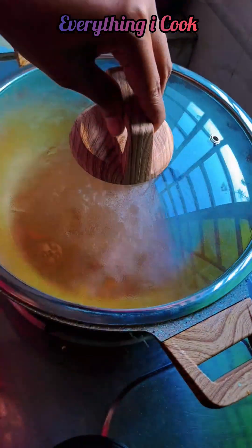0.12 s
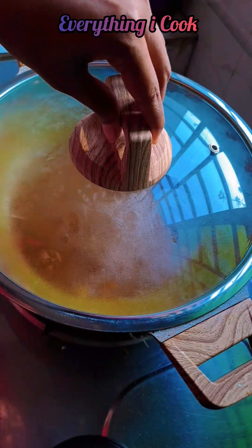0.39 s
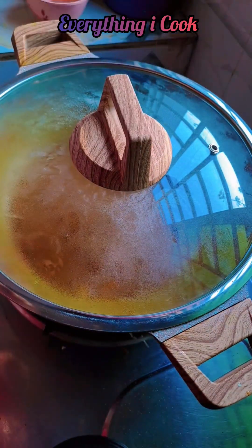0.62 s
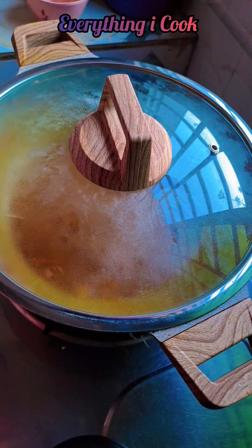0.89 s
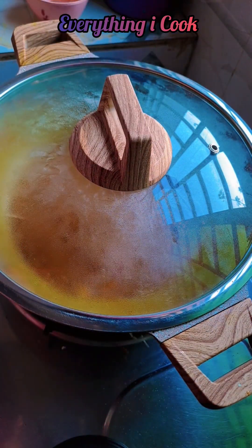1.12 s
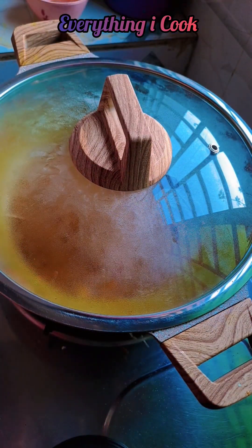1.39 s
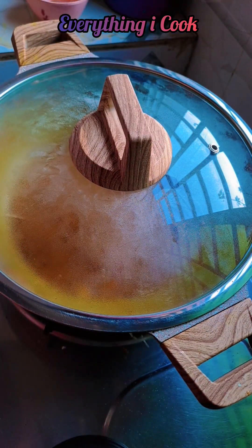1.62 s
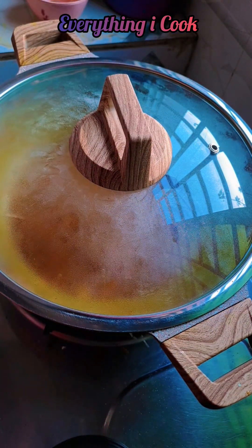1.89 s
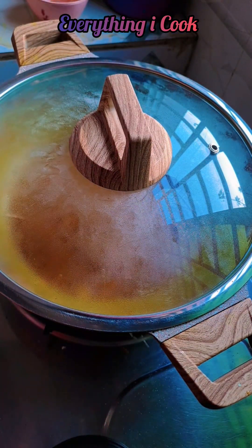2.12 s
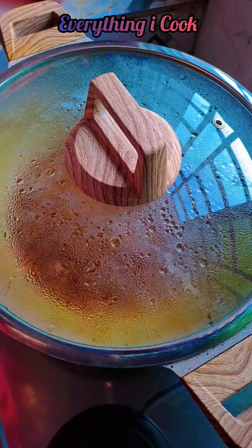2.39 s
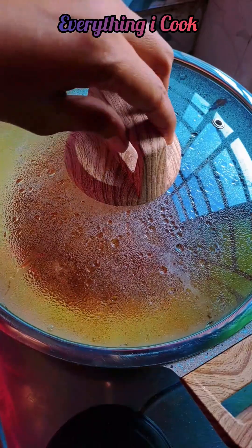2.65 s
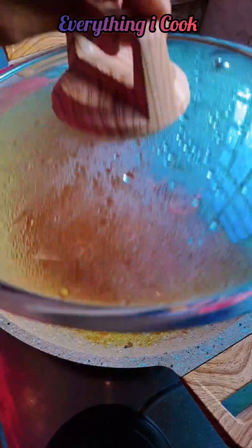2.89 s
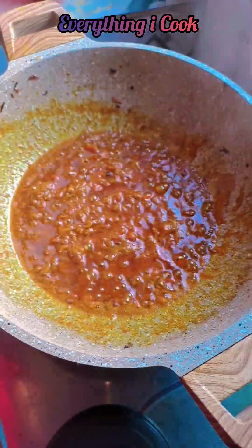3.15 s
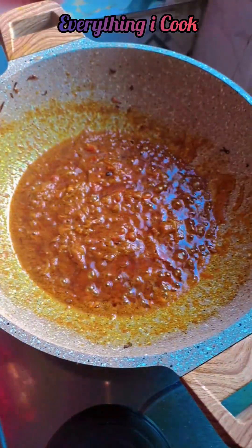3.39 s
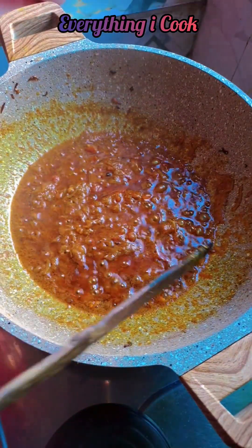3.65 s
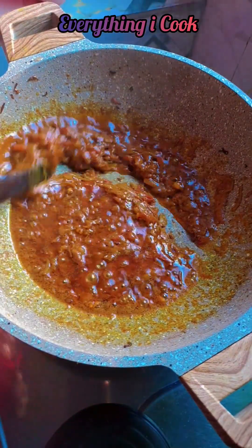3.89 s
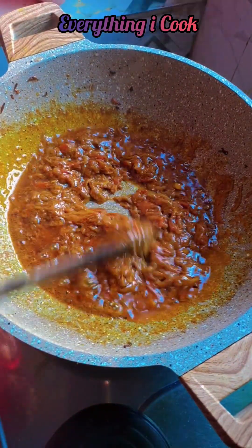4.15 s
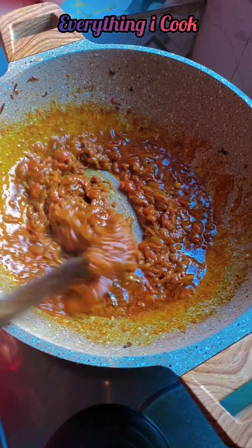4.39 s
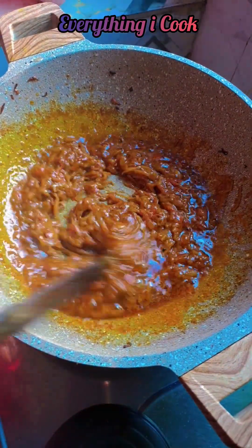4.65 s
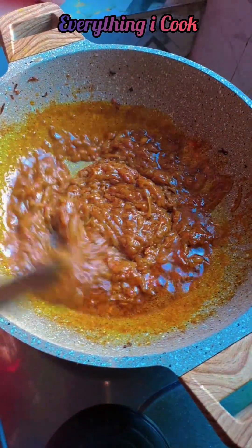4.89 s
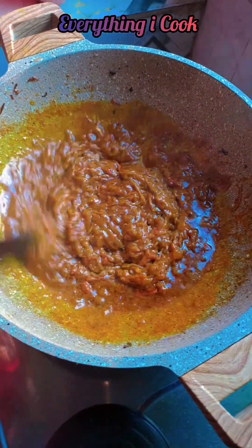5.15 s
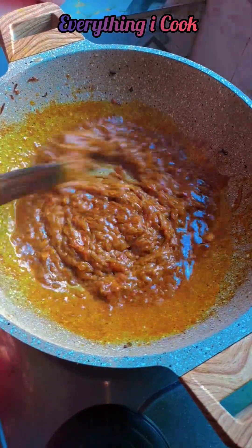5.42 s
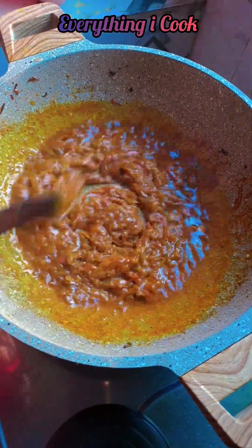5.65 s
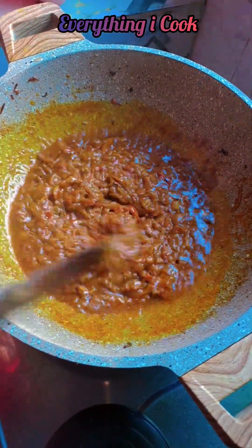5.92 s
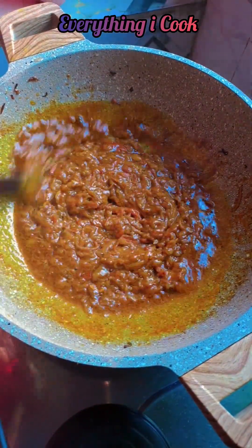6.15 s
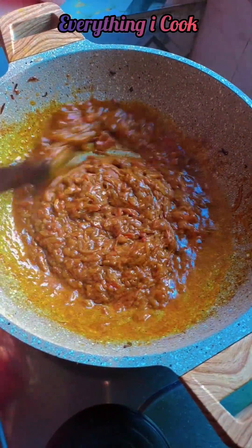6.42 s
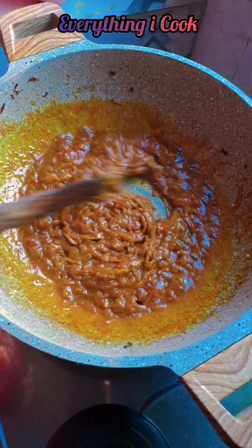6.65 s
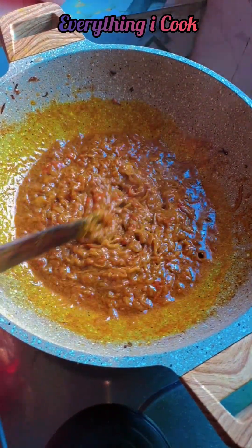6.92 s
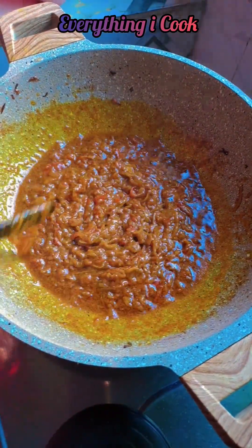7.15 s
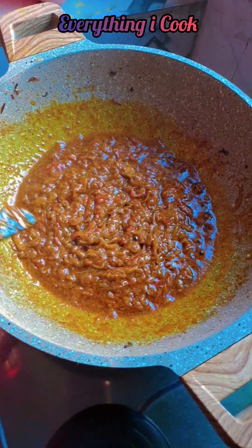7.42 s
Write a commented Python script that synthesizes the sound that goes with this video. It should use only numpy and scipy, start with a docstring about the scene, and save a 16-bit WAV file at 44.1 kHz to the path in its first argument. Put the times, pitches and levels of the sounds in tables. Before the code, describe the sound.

A close, slightly dull-topped home kitchen with low rumble, faint gas hiss and short reflections. At 0.05 s a lid lands with a low pan thud. From 0.3 to 1.2 s wooden objects shuffle in irregular knocks, with fainter ones near 1.6. Quick, rough trilled bird whistles, mostly falling, come at 1.15-1.6 and 2.1; dishes knock around 1.9-2.1. Complete silence from 2.2 to 2.38, then a fast fade-in: muffled glass lid knocks and a strong clank at 3.0. Frying is now open, a soft sizzle that swells from 3.6, with bright spits at 3.9-4.9 and a crackle cluster near 4.8. A spatula rubs and bumps, with a hard blow at 4.97 and a heavy one at 6.06, the pan rocking low on its grate until 6.7. Small tinks are scattered throughout. Loud ringing rim raps come in pairs at 7.03/7.12 and 7.42/7.52, over easing sizzle.

```python
"""In a home kitchen a glass lid is set on a simmering pan; wood is shuffled, dishes clatter, a bird calls outside.
After a short silence the lid comes off, the sauce fries openly and a wooden spatula stirs it, scraping the pan,
rocking it on the stove and rapping the rim in two pairs. Knocks are short noise bursts that make sets of notes ring;
frying and rubbing are showers of random clicks; the air is shaped noise; the bird is gliding, trilled whistles."""
import sys
import numpy as np
from scipy import signal
from scipy.fft import rfft, irfft, next_fast_len
from scipy.io import wavfile

SR = 44100
rng = np.random.default_rng(int(sys.argv[2]) if len(sys.argv) > 2 else 0)


def makeup_ratio(level_db):
    """Linear amplitude ratio for a level in decibels (20 dB per factor of ten)."""
    decades = np.asarray(level_db, float) / 20
    return 10 ** decades


def dump_mix(stems):
    """Bounce the given channels to the path in sys.argv[1] as a 16-bit WAV at rate SR."""
    frames = np.atleast_2d(stems).T  # one column per channel
    limited = np.clip(frames, -1, 1)  # hard clip at full scale
    pcm = np.round(limited * 32767).astype(np.int16)
    wavfile.write(sys.argv[1], SR, pcm)


N = 332514

# Kitchen air and gas flame. Each row: pitch in Hz, relative strength in dB per Hz.
AIR_SPECTRUM = [(25, -15), (55, 6), (110, 2.5), (250, -3), (400, -6.5), (700, -17), (1500, -21.5),
                (3300, -31), (5000, -22.5), (7000, -30), (8300, -34.5), (10500, -34), (13000, -35),
                (16000, -29)]
# Whistle bands of the gas jet. Each row: pitch in Hz, width in Hz of each filter pass, average level in dB.
GAS_JET = [(6260, 1060, -65), (12500, 1600, -65.5)]
# Bird calls. Each row: start in seconds, length in seconds, first pitch in Hz, last pitch in Hz,
# level in dB before the trill.
BIRD_CALLS = [(1.147, 0.05, 2700, 3160, -48.5), (1.163, 0.072, 5060, 2890, -46),
              (1.35, .12, 2000, 2500, -62.5), (1.447, 0.054, 4270, 3980, -58.5),
              (1.527, 0.091, 4700, 3450, -50), (2.102, 0.093, 5200, 2700, -47)]

# Knocks of hard things. Each row: start in seconds, peak in dB, rattle length in seconds,
# tilt of the ringing in dB per octave, hardness as scratch in dB against the ringing.
WOOD_SHUFFLES = [(.332, -26, .025, 8.5, -10.5), (.390, -28, 0.024, -3.5, -38.5),
                 (.538, -29.5, 0.051, 0.5, -14), (.682, -18.5, 0.062, 3.5, -38),
                 (.755, -22, 0.038, 4.5, -40), (.80, -28, 0.083, -4.5, -19), (.87, -30.5, 0.082, 0, -33),
                 (.942, -21.5, 0.039, -2.5, -12), (.983, -19, 0.012, 6, -19), (1.056, -31, .008, 7.5, -19),
                 (1.066, -23, 0.0064, -9, -35), (1.152, -41, 0.027, 12, -6), (1.46, -48, 0.055, -5, -5),
                 (1.606, -37.5, 0.029, -1, 1.5), (1.63, -32, 0.032, -7, -15),
                 (1.683, -38, 0.013, -7.5, -12)]
DISH_KNOCKS = [(.942, -36, 0.069, 5, -3), (1.924, -23.5, 0.031, 0.7, -8), (1.965, -32, 0.019, 0, -2),
               (2.068, -38.5, 0.024, -2.5, -22)]
LID_SET_DOWN = [(.055, -18, 0.034, -9, -20.5)]
LID_KNOCKS = [(2.40, -34.5, 0.1, 4, -26), (2.452, -28.5, 0.059, 4.5, -5), (2.566, -24.5, .013, -9, -35),
              (2.602, -19, 0.035, 3, -6), (2.635, -27.5, 0.026, -8, -10), (2.70, -33.5, .015, 4.5, -1),
              (2.772, -29.5, 0.035, -13, -21), (2.806, -34, 0.0048, 17, -1), (2.81, -30, 0.054, -12, -30),
              (2.955, -32.5, 0.016, 5, -12), (3.035, -14, 0.027, -3, -35)]
LID_CLANKS = [(3.02, -14.5, 0.026, 4.2, 0.97)]
STIR_KNOCKS = [(3.563, -27, 0.0085, -8, -19), (4.205, -28.5, 0.02, -6, -19), (4.61, -26.5, 0.014, 3, -8),
               (4.93, -29.5, 0.046, -3, -21.5), (4.972, -15.5, 0.027, -11, -9), (5.353, -37, 0.01, -1, -15),
               (5.613, -29, .008, 1, -10), (5.915, -29, .016, 0, -7), (6.062, -11, .03, -1.5, -5),
               (6.11, -31, 0.018, -11, -2), (6.245, -25, 0.03, 1.3, -33), (6.379, -31.5, 0.054, 4.5, -9),
               (6.58, -22, 0.035, 1, -9), (6.64, -31.5, .033, 0.5, -2), (6.975, -33, 0.0067, -2, -15),
               (7.346, -29, 0.025, -7.5, -15)]
SPATULA_BLOW = [(4.974, -15.5, 0.017, 0.1, -8)]
# Raps on the rim. Each row: start in seconds, peak in dB, hardness as scratch in dB against the ringing.
RAPS = [(7.0293, -3.5, -23), (7.1215, -6, -7.5), (7.4193, -5, -18.5), (7.5247, -4, -21)]
# The pan drops back on the grate. Each row: start in seconds, peak in dB.
ROCKS = [(6.067, -14), (6.19, -30.5), (6.247, -22.5), (6.497, -35), (6.583, -26.5), (6.659, -36),
         (6.735, -36)]
# Small one-note tinks. Each row: start in seconds, level in dB before onset and decay, middle pitch in Hz.
TINK_NOTES = [(.597, -51, 3730), (2.454, -32.5, 1650), (2.699, -31.5, 1570), (2.807, -38.5, 2810),
              (3.25, -37, 760), (4.272, -32.5, 2580), (4.529, -29, 2580), (5.401, -31.5, 2600),
              (6.675, -29, 1630), (6.794, -32.5, 1610), (7.18, -32.5, 2690)]

# What rings in each thing. Each row: pitch in Hz, relative level in dB,
# time in seconds to fade by 60 dB when nothing damps it.
WOOD_MODES = [(320.4, -1, 0.28), (359, -11.5, 0.18), (696, 0.5, 0.089), (773, 2.5, .1), (904, -2, 0.069),
              (1210, -7, 0.078), (1387, -11, 0.08), (1980, -6.5, 0.012), (2450, -11.5, 0.013),
              (3070, -20, .03)]
CROCKERY_MODES = [(1064, 2.5, 0.052), (1770, 4.5, 0.046), (2253, -0.5, .2), (2270, 3.5, 0.1),
                  (2550, -11.5, 0.094), (3870, 1.5, 0.11), (5550, 2, 0.1), (5900, -5, .08),
                  (7240, -20, .08), (7967, -26, .06), (9700, -15, .06), (11100, -1.5, .06),
                  (12300, -9, .08)]
GRATE_MODES = [(97, 2.5, 0.13), (181.4, -9.5, 0.2)]
CLOSED_PAN_MODES = [(64.5, -26, 0.44), (116, -7.5, 0.046), (159, 1, 0.35), (230, 8, 0.13), (377, -12, 0.19),
                    (474, 2.5, .14), (802, -51, .1), (1390, -22, .08)]
GLASS_MODES = [(204, -9, 0.28), (259, -4.5, 0.34), (328, 5, .15), (408.5, -2.5, 0.17), (502, -3, 0.13),
               (692, -3.5, 0.12), (790, -11, 0.063), (1809, -17.5, 0.85), (1964, -6, 0.11),
               (2320, -8.5, 0.061), (2900, -19.5, 0.042), (4300, -23, .05), (5060, -12, 0.082),
               (6530, -44, .08)]
PAN_MODES = [(146, -14, 1), (229.3, -4, 0.51), (299, -1.5, 0.26), (356.5, 0.5, 0.22), (416.4, -1.5, 0.39),
             (480.4, 6, 0.17), (547, -0.5, 0.22), (621, -2.5, 0.11), (608, 12, 0.046), (688, -3.5, 0.15),
             (745, -5.5, 0.22), (832, -4.5, 0.04), (1028, -5, 0.092), (1034, -3, 0.033), (1187, -3.5, 0.31),
             (1373, -7, 0.21), (1540, -54, 0.078), (1780, -19, .06), (2000, -1, 0.14), (2600, -1, 0.15),
             (2916, -11, 0.22), (4270, 1, 0.061), (5200, -10, 0.13), (6540, -5, 0.073)]
SPATULA_MODES = [(1396, -5.5, 0.1), (2600, -0.7, 0.055), (4600, -2.5, 0.068), (7150, -8, .05)]

# Spatula or lid pressing on the pan as it rubs. Each row: time in seconds, rubbing level in dB before unevenness.
RUBBING_LEVEL = [(2.66, -52), (3.47, -54.5), (4.22, -46), (5.09, -43), (5.62, -47), (5.85, -44.5),
                 (6.11, -40), (6.3, -44), (6.87, -51), (7.43, -46), (7.54, -43)]
# Dull resonances of the full pan. Each row: pitch in Hz, width in Hz, relative level in dB.
RUBBED_MODES = [(278, 200, -6), (600, 82, 4.5), (790, 83, 1), (1173, 155, -4), (1650, 440, -9.5),
                (2580, 170, -6.5)]
# The sauce frying. Each row: time in seconds, vigour as fizz in dB,
# brightness in dB (up where bare hot pan is laid open).
FRYING_COURSE = [(2.66, -49.5, -3.5), (3.56, -50.5, -4.5), (3.62, -46, -4.5), (4.05, -38.5, 4.5),
                 (4.14, -41, 2.5), (4.28, -38.5, 1.5), (4.59, -36.5, 2), (4.79, -42, -0.5),
                 (4.93, -39.5, 0.5), (5.1, -40.5, -8), (5.3, -43, 2.5), (5.37, -42.5, -5.5),
                 (5.54, -39.5, 1), (5.68, -41.5, -1.5), (5.88, -40.5, 5), (6.41, -44.5, -6),
                 (6.62, -41, 1.5), (6.72, -43, -2), (6.84, -42, -1), (6.9, -45.5, -3.5), (7.3, -47, -4.5),
                 (7.54, -44.5, -6)]
# Colour of the fizz. Each row: pitch in Hz, relative strength in dB per Hz.
FIZZ_SPECTRUM = [(710, -7.5), (1200, -2.5), (2180, -6), (2530, -2.5), (3250, -3), (4310, -1.5),
                 (5300, -3.5), (6650, -6), (7600, -9), (9000, -8.5), (10400, -6), (11800, -0.5),
                 (13200, -5.5), (15200, -6.5), (16000, -10.5)]
# The loudest spits of oil. Each row: time in seconds, peak in dB, pitch in Hz.
LOUD_POPS = [(3.8965, -22, 11900), (4.0078, -20.5, 11300), (4.0277, -18.5, 11500), (4.0502, -19, 11800),
             (4.2255, -17.5, 11900), (4.2832, -18, 11800), (4.3505, -21, 11500), (4.5027, -16, 12100),
             (4.5965, -15, 11800), (4.6165, -23, 11900), (4.772, -18, 4100), (4.8281, -17, 11000),
             (4.8963, -18, 4760), (5.8456, -15, 10500)]

SILENCE_S, FADE_IN_S = (2.2165, 2.377), 0.04


def rms_one(x):
    """Scale a sound to an average (rms) strength of 1."""
    return x / np.sqrt(np.mean(x ** 2) + 1e-20)


def in_time(rows):
    """Draw each column of a time table as a curve with one value a sample."""
    s, *columns = np.transpose(rows)
    return [np.interp(np.arange(N) / SR, s, c) for c in columns]


def drift(rate_hz):
    """Slow random wandering of spread 1: noise smoothed twice, worked out at every 40th sample."""
    r = np.exp(-80 * np.pi * rate_hz / SR)
    noise = rng.standard_normal(N // 40 + 2002)
    slow = signal.lfilter([1], [1, -2 * r, r * r], noise)[2000:]   # leave out the start-up
    return np.interp(np.arange(N) / 40, np.arange(len(slow)), rms_one(slow))


def coloured(x, spectrum):
    """Weight the pitches of x by a spectrum of (Hz, dB) points and scale to rms 1."""
    hz, db = np.transpose(spectrum)
    bins = np.maximum(np.arange(len(x) // 2 + 1) * SR / len(x), 1)
    weight = makeup_ratio(np.interp(np.log(bins), np.log(hz), db))
    return rms_one(irfft(rfft(x) * weight, len(x)))


def resonance(x, hz, width_hz):
    """Let through a band around one pitch, like a damped spring, with gain 1 on top."""
    r = np.exp(-np.pi * width_hz / SR)
    top = np.array([1, 0, -1]) * (1 - r * r) / 2
    return signal.lfilter(top, [1, -2 * r * np.cos(2 * np.pi * hz / SR), r * r], x)


def ring(x, hz, t60):
    """Ring a note that fades by 60 dB in t60 seconds; a unit click starts it at height 1."""
    return resonance(x, hz, np.log(1000) / np.pi / t60) * SR * t60 / np.log(1000)


def grains(per_s, spread_db):
    """Random clicks of either sign, many small and a few large."""
    sizes = makeup_ratio(spread_db * np.minimum(rng.exponential(1, N), 5)) * rng.choice([-1, 1], N)
    return sizes * (rng.random(N) < per_s / SR) + 1e-18


def add(out, s, sound):
    """Mix a short sound in at time s in seconds."""
    i = round(s * SR)
    out[i:i + len(sound)] += sound[:N - i]


def contacts(events, modes, damping, dense_db, scratch_hz, rise_s, softening):
    """Each knock is a noise burst that rings the modes, each with two chance neighbours, and is heard as a scratch.
    softening: dB of longer rise time per dB of lost scratch (a negative one shortens the rise)."""
    out, t = np.zeros(N), np.arange(int(.4 * SR)) / SR
    for s, db, rattle, tilt_db, scratch_db in events:
        rise = rise_s * makeup_ratio(-softening * scratch_db)
        envelope = (1 - np.exp(-t / rise)) * np.exp(-(t / rattle) ** 2)
        force = rng.standard_normal(len(t)) * envelope + 1e-18
        detune, body = rng.uniform(-1.06, 1, (len(modes), 2)), 0
        for (hz, mode_db, t60), pair in zip(modes, detune):
            t60 = t60 * damping   # below 1 the ringing is shorter
            near = resonance(force, hz, 0.79 * hz)   # a mode takes up mostly force near its own pitch
            neighbours = [(hz * (1 + 0.127 * p), dense_db, 0.93 * t60) for p in pair]
            for f, d, decay in [(hz, 0, t60)] + neighbours:
                note = ring(near, f, decay)
                level = makeup_ratio(mode_db + d + tilt_db * np.log2(f / 600)) * np.sqrt(decay)
                body = body + level * note / np.linalg.norm(note)
        scratch = resonance(force, scratch_hz, 0.67 * scratch_hz)
        scratch = resonance(scratch, scratch_hz, 2.93 * scratch_hz) + 0.0093 * force
        sound = body / np.abs(body).max() + makeup_ratio(scratch_db) * scratch / np.abs(scratch).max()
        add(out, s, makeup_ratio(db) * sound / np.abs(sound).max())
    return out


def air():
    """Low rumble of the house, faint flame hiss and two gas-jet whistles, all noise of wandering level."""
    # the level rises once the cook works at the stove, 3.55 s in
    level_db = np.where(np.arange(N) < 3.55 * SR, -52, -48)
    out = makeup_ratio(level_db + 1.9 * drift(5.7)) * coloured(rng.standard_normal(N), AIR_SPECTRUM)
    for hz, width, db in GAS_JET:
        whistle = rng.standard_normal(N)
        for _ in range(3):
            whistle = resonance(whistle, hz, width)
        out += makeup_ratio(db + 1.1 * drift(7.0)) * rms_one(whistle)
    return out


def bird():
    """Whistles, most of them falling, whose loudness trills 145 times a second and whose pitch is rough."""
    out = np.zeros(N)
    for s, length, start_hz, end_hz, db in BIRD_CALLS:
        t = np.arange(int(length * SR)) / SR
        waver = rms_one(signal.lfilter([1], [1, -.98], rng.standard_normal(SR // 4)))[:len(t)]
        pitch = (start_hz + (end_hz - start_hz) * t / length) * (1 + 0.091 * waver)
        trill = (1 + 0.41 * np.cos(2 * np.pi * 145 * t)) * np.sin(np.pi * t / length)
        add(out, s, makeup_ratio(db) * trill * np.sin(2 * np.pi * np.cumsum(pitch) / SR))
    return out


def shuffled_wood():
    """Knocks set wood ringing; the softer ones build up their force more slowly."""
    return contacts(WOOD_SHUFFLES, WOOD_MODES, damping=0.66, dense_db=-17, scratch_hz=1900,
                    rise_s=.002, softening=0.74)


def dishes():
    """Knocks set the many high notes of crockery ringing briefly."""
    return contacts(DISH_KNOCKS, CROCKERY_MODES, damping=0.4, dense_db=1, scratch_hz=2500,
                    rise_s=0.0018, softening=0)


def kitchen(x):
    """Reflections from the room: ten echo loops, quieter and duller on every round."""
    t60_s, wall_cut_hz = 0.23, 5400   # fading time before the dulling, pitch where dulling sets in
    size = next_fast_len(N + SR)
    w = 2 * np.pi * np.arange(size // 2 + 1) / size
    dull = 1 / (1 + 1j * w * SR / (2 * np.pi * wall_cut_hz))
    response = 0
    for k, lag in enumerate(rng.uniform(.009, .035, 10)):
        loop = makeup_ratio(-60 * lag / t60_s) * dull ** 0.31 * np.exp(-1j * w * lag * SR)
        response = response + (-1) ** k * loop / (1 - loop)
    return irfft(rfft(x, size) * response, size)[:N]


def tinks():
    """Small hard things touch: short fading notes of slightly wavering pitch."""
    t60_s, roughness = 0.097, 0.031   # roughness: share by which the pitch wavers
    out, t = np.zeros(N), np.arange(SR // 4) / SR
    for s, db, hz in TINK_NOTES:
        waver = rms_one(signal.lfilter([1], [1, -.995], rng.standard_normal(len(t))))
        note = np.sin(2 * np.pi * hz * np.cumsum(1 + roughness * waver) / SR)
        add(out, s, makeup_ratio(db - 60 * t / t60_s) * (1 - np.exp(-t / 0.0017)) * note)
    return out


def rocking():
    """The rocking pan drops back and rings two low notes of the stove grate."""
    events = [(s, db, 0.025, -2, -40) for s, db in ROCKS]   # rattle s, tilt dB per octave, scratch dB
    return contacts(events, GRATE_MODES, damping=1.0, dense_db=-27, scratch_hz=400, rise_s=.006, softening=0)


def lid():
    """The lid rings the closed pan as it is set down; handled later, its glass knocks dully, then clanks freely."""
    out = contacts(LID_SET_DOWN, CLOSED_PAN_MODES, damping=0.88, dense_db=7.0, scratch_hz=1490,
                   rise_s=.0007, softening=0)
    out += contacts(LID_KNOCKS, GLASS_MODES, damping=0.19, dense_db=1, scratch_hz=2000,
                    rise_s=0.0036, softening=0.05)   # hands shorten the ringing
    out += contacts(LID_CLANKS, GLASS_MODES, damping=0.92, dense_db=-18, scratch_hz=2680,
                    rise_s=0.0011, softening=0)
    return out


def stirring_knocks():
    """The spatula bumps the full pan, and one hard blow rings the spatula itself."""
    # the sauce holds the lowest mode still and shortens the others
    out = contacts(STIR_KNOCKS, PAN_MODES[1:], damping=0.37, dense_db=-0.5, scratch_hz=1810,
                   rise_s=0.0066, softening=-0.13)
    out += contacts(SPATULA_BLOW, SPATULA_MODES, damping=0.86, dense_db=-19, scratch_hz=7000,
                    rise_s=0.0034, softening=0)
    return out


def rim_raps():
    """Very short raps on the rim ring all the notes of the pan."""
    events = [(s, db, .002, -2.5, scratch_db) for s, db, scratch_db in RAPS]   # rattle s, tilt dB per octave
    return contacts(events, PAN_MODES, damping=0.59, dense_db=-7.5, scratch_hz=3420, rise_s=0.00069, softening=0)


def rubbing():
    """Things drag over the pan's coating: dense clicks pass through the damped resonances of the full pan."""
    clicks = grains(3000 * makeup_ratio(2.3 * drift(15)), spread_db=1.5)
    body = 0
    for k, (hz, width, db) in enumerate(RUBBED_MODES):
        body = body + (-1) ** k * makeup_ratio(db) * resonance(clicks, hz, width)
    uneven_db = 1.8 * drift(14)
    return makeup_ratio(in_time(RUBBING_LEVEL)[0] + uneven_db) * rms_one(body)


def chance_pops(fizz_db):
    """More rows of pops: stray spits that follow the vigour of the frying, and one cluster of crackles."""
    stray_per_s, stray_over_fizz_db, stray_hz = 90.0, 8, (5000, 11800)   # big drops low, small drops high
    # wet sauce pushed onto hot metal crackles in a cluster
    crackle_s, crackle_per_s, crackle_db, crackle_hz = (4.71, 4.91), 260, -29, 4500
    t, luck = np.arange(N) / SR, rng.random((4, N))
    stray = np.flatnonzero((luck[0] < stray_per_s / SR) & (t > SILENCE_S[1]))
    in_cluster = (t > crackle_s[0]) & (t < crackle_s[1])
    crackle = np.flatnonzero((luck[0] > 1 - crackle_per_s / SR) & in_cluster)

    def vary(i, db, hz):
        """Scatter one pop by up to 4.5 dB and a tenth of its pitch either way."""
        return t[i], db + 9 * (luck[1, i] - .5), hz * (1 + 0.2 * (luck[2, i] - .5))

    rows = [vary(i, fizz_db[i] + stray_over_fizz_db, stray_hz[int(luck[3, i] < .6)]) for i in stray]
    return rows + [vary(i, crackle_db, crackle_hz) for i in crackle]


def frying():
    """Steam bubbles burst in the oil: a clumped bed of tiny clicks and hiss, pitched spits and louder pops."""
    fizz_db, treble_db = in_time(FRYING_COURSE)
    bed = grains(9000 * makeup_ratio(3.0 * drift(29)), spread_db=3.5) + 0.9 * rng.standard_normal(N)
    spits = grains(250 * makeup_ratio(3.3 * drift(7.4)), spread_db=4.0)
    dealt = rng.integers(0, 10, N)   # each spit gets one of ten pitches
    pitched = 0
    for k, hz in enumerate(np.geomspace(3000, 14000, num=10)):
        pitched = pitched + resonance(spits * (dealt == k) + 1e-18, hz, 0.37 * hz)
    bed = coloured(rms_one(bed) + makeup_ratio(-11.0) * rms_one(pitched), FIZZ_SPECTRUM)
    bed = bed * makeup_ratio(0.97 * drift(13.0) + 1.58 * drift(45))   # flickering level
    low = signal.sosfilt(signal.butter(4, 8200, fs=SR, output="sos"), bed)
    high = signal.sosfilt(signal.butter(4, 8200, "high", fs=SR, output="sos"), bed)
    out = makeup_ratio(fizz_db) * (rms_one(low) + makeup_ratio(treble_db) * rms_one(high))
    t = np.arange(400) / SR
    for s, db, hz in LOUD_POPS + chance_pops(fizz_db):
        burst = rng.standard_normal(400) * np.exp(-np.abs(t - .001) / 0.00029)
        spit = .08 * burst + resonance(resonance(burst, hz, 0.42 * hz), hz, 0.42 * hz)
        add(out, s, makeup_ratio(db) * spit / np.abs(spit).max())
    return out


def scene():
    """Mix it all: sounds from across the kitchen send more into the reflections than those at the stove."""
    across = shuffled_wood() + dishes() + bird()
    hits = lid() + stirring_knocks() + rim_raps() + tinks()
    reflections = makeup_ratio(-17) * kitchen(hits + makeup_ratio(2.0) * across)
    lid_off = np.arange(N) > SILENCE_S[0] * SR   # the closed lid keeps the frying in
    open_pan = (frying() + rubbing()) * lid_off
    return (air() + across + reflections + rocking() + hits + open_pan)[None]


def band_limit(x):
    """A steep low-pass at the top of the band."""
    return signal.sosfilt(signal.butter(12, 16160, fs=SR, output="sos"), x)


def record(dry):
    """The microphone is weak near 8.4 kHz and the top is cut off; the sound goes silent once, then fades in again."""
    t = np.arange(N) / SR
    gate = (t < SILENCE_S[0]) + np.clip((t - SILENCE_S[1]) / FADE_IN_S, 0, 1)
    cut = signal.sosfilt(signal.ellip(12, .3, 60, 15520, fs=SR, output="sos"), dry)   # top cut at 15520 Hz
    cut = cut - 0.35 * resonance(cut, 8360, 1880)   # take out 35 % at the middle of the dip
    return band_limit(cut * gate)


dry = scene()
out = record(dry)
dump_mix(out)
```